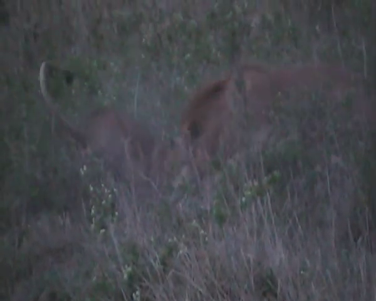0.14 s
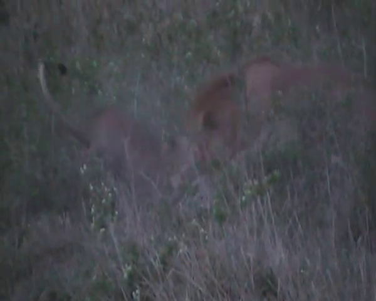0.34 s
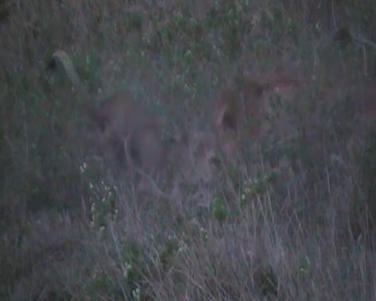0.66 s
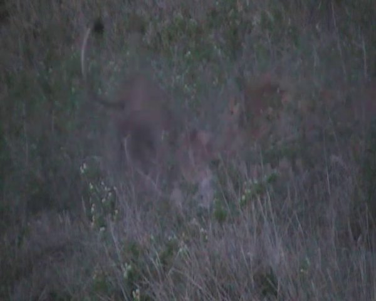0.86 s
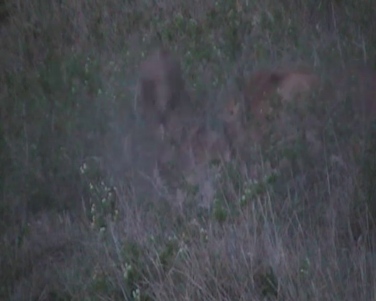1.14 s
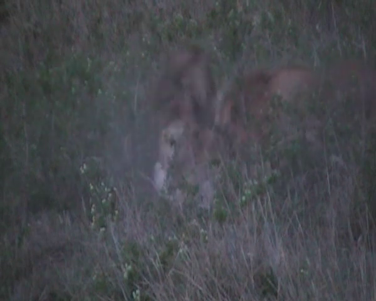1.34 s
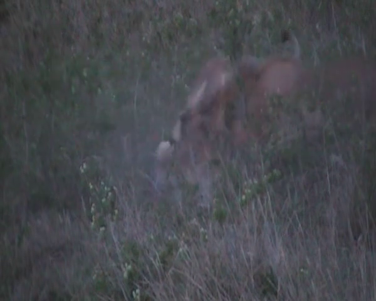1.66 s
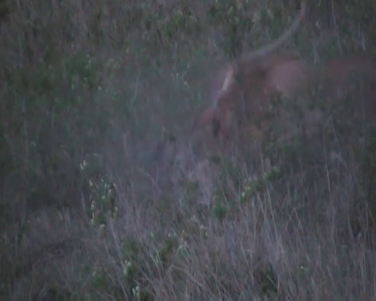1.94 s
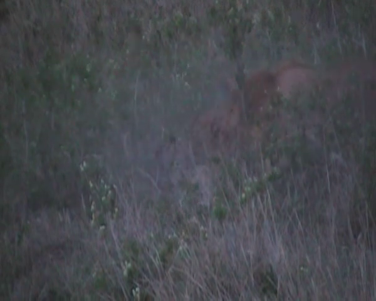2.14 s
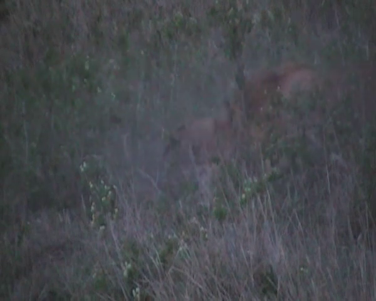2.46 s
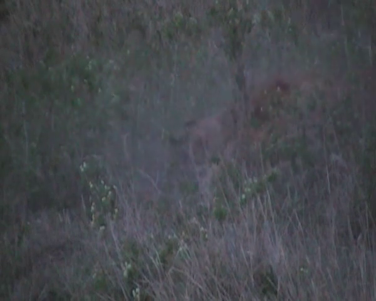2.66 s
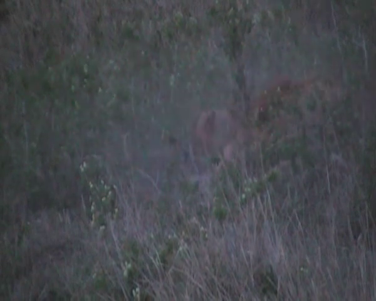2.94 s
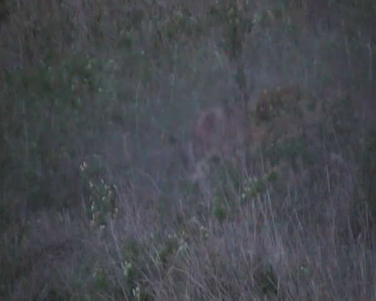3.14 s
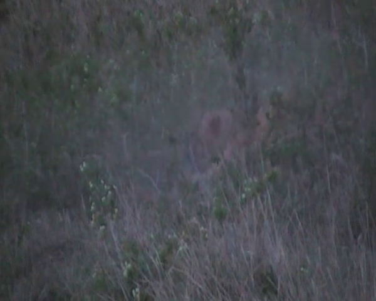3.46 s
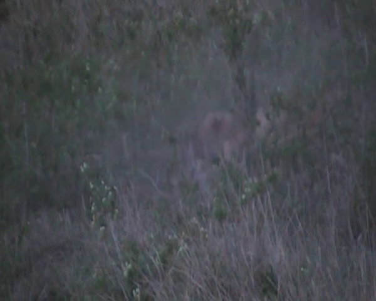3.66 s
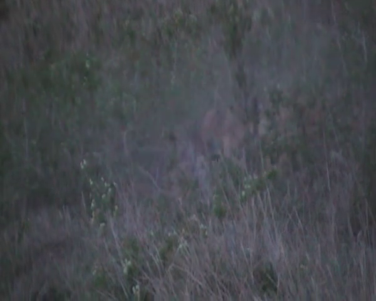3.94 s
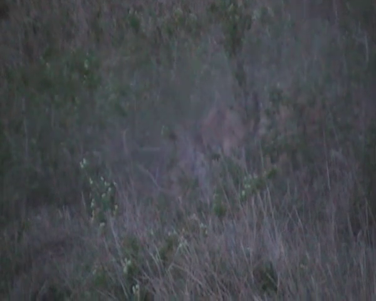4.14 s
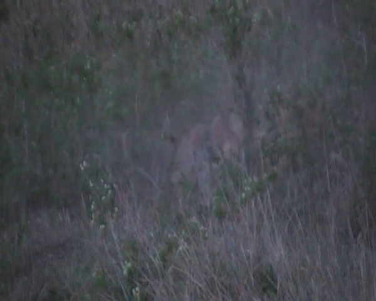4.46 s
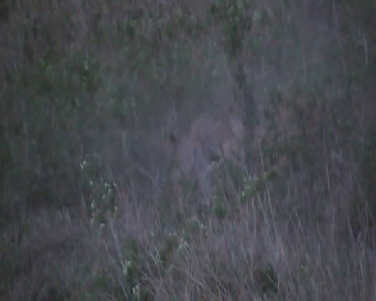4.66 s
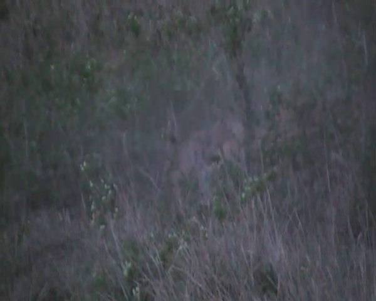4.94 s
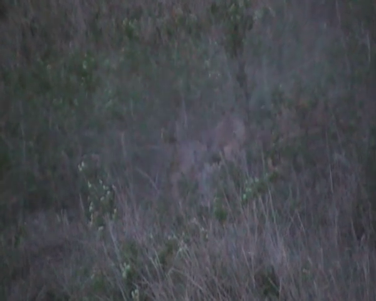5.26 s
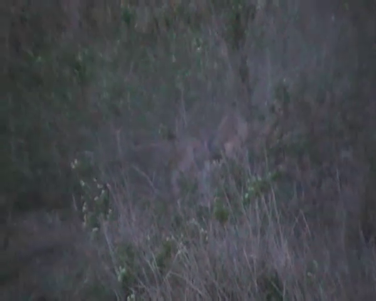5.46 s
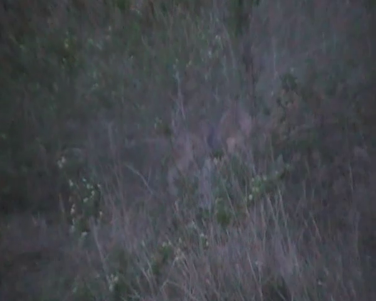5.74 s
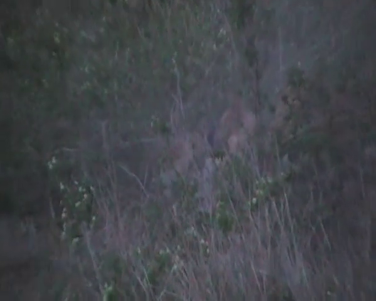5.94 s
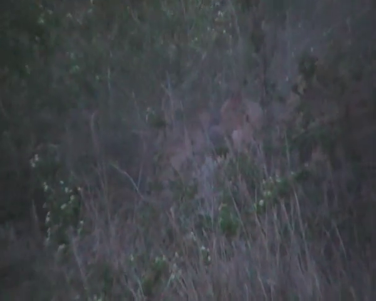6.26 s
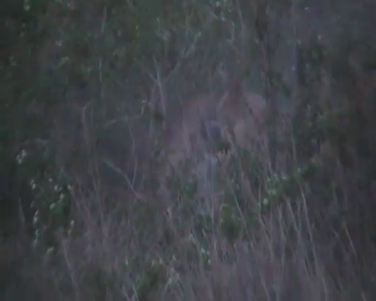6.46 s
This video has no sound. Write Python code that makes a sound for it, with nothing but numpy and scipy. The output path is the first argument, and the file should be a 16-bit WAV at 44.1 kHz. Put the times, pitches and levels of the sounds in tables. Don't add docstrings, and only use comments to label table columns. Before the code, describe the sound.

Dusk in grassy bush, heard through a stereo microphone with slightly dulled top treble. After a silent start, twigs crack and a cricket chirps, then a warthog in distress screams piercingly for over two seconds, rasping and breathy. A gasping pause with thuds follows, then a clearer squeal, broken catches, rapid throat clicks and a loud closing squeal over faint insect hum and low engine throb.

```python
import sys
import numpy as np
from scipy import signal
from scipy.fft import rfft, irfft, next_fast_len
from scipy.io import wavfile
from scipy.ndimage import uniform_filter1d, map_coordinates

SR = 44100
rng = np.random.default_rng(int(sys.argv[2]) if len(sys.argv) > 2 else 0)


def dump(signal):
    limited = np.clip(np.atleast_2d(signal).T, -1, 1)
    pcm = np.round(limited * 32767).astype(np.int16)
    wavfile.write(sys.argv[1], SR, pcm)


def invert_db(x):
    u = np.asarray(x, float) / 20
    return 10 ** u


N = 291045
T = np.arange(N) / SR


def unit(x):
    return x / np.sqrt(np.mean(x ** 2) + 1e-20)


def along(points, hz):
    f, v = np.transpose(points)
    return np.interp(np.log(hz + 1), np.log(f + 1), v)


def curves(rows):
    s, *cols = np.transpose(rows)
    gate = np.clip(np.minimum(T - s[0], s[-1] - T) / 0.0025 + .5, 0, 1)
    return [gate] + [np.interp(T, s, c) for c in cols]


def wobble(rate, size=N):
    return map_coordinates(rng.standard_normal(int(size * rate / SR) + 4), [T[:size] * rate])


def filtered(x, response):
    m = next_fast_len(N + SR // 2)
    return irfft(rfft(x, m) * response(np.fft.rfftfreq(m, 1 / SR)), m)[..., :N]


def coloured(x, spectrum):
    return unit(filtered(x, lambda hz: invert_db(along(spectrum, hz))))


def peak(f, hz, width):
    return 1j * f * width / (hz * hz - f * f + 1j * f * width)


# frequency in Hz, level in dB.
DUSK = [(20, 8), (32, -3), (47, -16), (75, 5), (130, -3.5), (200, -0.5), (300, -2), (700, -5), (1000, -10),
        (2300, -13), (2900, -19), (3800, -16.5), (4700, -18), (10000, -19.5), (12000, -36), (15000, -56)]
# time in seconds, level in dB.
DUSK_LEVEL = [(.69, -63), (.72, -38), (1.1, -41.5), (3.9, -43.5), (6.6, -45)]
# frequency in Hz, correlation from -1 to 1.
ALIKE = [(25, .45), (60, 0.9), (130, 0.22), (290, -0.2), (630, -0.17), (1370, 0.26), (3010, 0.16),
         (6580, 0.72), (14400, 0.76)]


def dusk():
    turn = lambda hz: np.arccos(np.clip(along(ALIKE, hz), -1, 1)) / 2
    noise = rng.standard_normal((2, N)) * invert_db(1.3 * wobble(12.0))
    mid, side = filtered(noise, lambda hz: invert_db(along(DUSK, hz)) * [np.cos(turn(hz)), np.sin(turn(hz))])
    grass = unit(np.array([mid + side, mid - side]))
    chorus = unit(filtered(rng.standard_normal((2, N)), lambda f: peak(f, 4660, 300) ** 2))
    throb = lambda f: peak(f, 75.0, 30.0) ** 2 + 0.46 * peak(f, 99.8, 13.0) ** 2
    idle = unit(filtered(rng.standard_normal(N), throb))
    hiss = grass + invert_db(-5.0 + 4.5 * wobble(50)) * chorus
    return invert_db(curves(DUSK_LEVEL)[1]) * hiss + invert_db([[-52], [-50.5]]) * idle


# first chirp in seconds, end in seconds, gap in ms, peak in dB.
BOUTS = [
    (.7225, 2.7, 92.1, -30),
    (4.692, 5.5, 94.4, -32.5),
    (5.542, 6.33, 92.3, -33.5),
]


def cricket():
    out, t = np.zeros(N + SR), np.arange(SR // 20) / SR
    shape = np.interp(t, [0, .004, .012, .022, .03], [0.058, 0.74, 0.92, 0.85, 0.017])
    pitch_hz = 4830 - 230000 * t ** 2 - 2500 * t
    note = shape * np.sin(2 * np.pi * np.cumsum(pitch_hz) / SR)
    for first, end, gap_ms, db in BOUTS:
        for s in np.arange(first, end, gap_ms / 1000):
            out[round(s * SR):][:len(t)] += invert_db(db + 5.0) * note
    return out[:N]


# time in seconds, level in dB, ring in Hz.
TWIGS = [
    (0.89, -29, 7540),
    (0.94, -24, 7450),
    (0.961, -16, 8900),
    (0.972, -22, 9950),
    (1.0246, -16, 8100),
    (1.061, -28, 9300),
    (5.8585, -20, 8900),
]
# time in seconds, peak in dB.
THUMPS = [
    (0.778, -29),
    (1.119, -23.5),
    (2.041, -24),
    (3.711, -21),
    (4.029, -22.5),
    (4.656, -33),
    (4.953, -26),
]


def scuffle():
    out, t = np.zeros(N + SR), np.arange(SR // 10) / SR
    for s, db, hz in TWIGS:
        snap = rng.standard_normal(len(t)) * .5 + np.sin(2 * np.pi * hz * t)
        decay = invert_db(-60 * t / 0.0016) + 0.26 * invert_db(-60 * t / 0.024)
        out[round(s * SR):][:len(t)] += invert_db(db) * decay * snap
    for s, db in THUMPS:
        swell = invert_db(db - 7.5 - 60 * t / 0.097) * (1 - np.exp(-t / 0.00063))
        out[round(s * SR):][:len(t)] += swell * np.sin(2 * np.pi * 190 * t)
    return out[:N]


# time in seconds, rate in Hz.
FLUTTER = [(1.1, 165), (1.23, 200), (1.39, 221), (1.45, 253), (1.68, 277), (1.76, 206), (2.02, 208),
           (2.2, 231), (2.45, 232), (2.7, 201), (2.89, 184), (3.08, 149), (3.2, 152), (3.42, 180),
           (3.7, 162), (4.24, 157), (4.5, 192), (4.6, 174), (4.79, 152.4), (5.25, 154.3), (6.6, 222)]


def folds():
    rate_hz = curves(FLUTTER)[1] * (1 + .05 * wobble(80) + .03 * wobble(12))
    cycles = np.cumsum(rate_hz) / SR
    strength = invert_db(1.06 * rng.standard_normal(N // 64)[cycles.astype(int)])
    return 2 * np.pi * cycles, strength


# level in dB, fundamental first.
OVERTONES = [0, -1, -12, -18.5, -21.5]


def whistle(rows, hoarse, weak_hoarse, depth, weak_depth, flap, size):
    sweep_hz, sweep_lead_rad, weak_db = 165, .3, 8
    span = slice(round(rows[0][0] * SR) - 200, round(rows[-1][0] * SR) + 200)
    gate, hz, db, step_db = (c[span] for c in curves(rows))
    flap, size, n = flap[span], size[span], len(gate)
    weak = np.clip((db.max() - db) / weak_db, 0, 1)
    hoarse = hoarse + (weak_hoarse - hoarse) * weak
    depth = depth + (weak_depth - depth) * weak
    drag_hz = -sweep_hz * (hoarse + depth) * size * np.sin(flap + sweep_lead_rad)
    drag_hz = drag_hz + hz * .04 * hoarse * wobble(500, n)
    drag = 2 * np.pi * np.cumsum(drag_hz) / SR
    unsteady_hz = hz * (1 + .009 * wobble(26, n) + .035 * hoarse * wobble(130, n))
    phase = 2 * np.pi * np.cumsum(unsteady_hz) / SR
    tone = 0
    for k, overtone_db in enumerate(OVERTONES):
        blur = wobble(750, n) * np.sin((k + .95) * phase) + wobble(750, n) * np.cos((k + .95) * phase)
        partial = np.sin((k + 1) * phase + (1 + .9 * k) * drag) + .38 * hoarse * (1 + k) ** .8 * blur
        tone = tone + invert_db(step_db * k ** 0.087 + overtone_db + (1.1 + k) * wobble(24.89, n)) * partial
    swell = unit((1.08 - np.cos(flap)) ** (1.05 * depth) * size ** depth)
    out = np.zeros(N)
    out[span] = np.sqrt(2) * gate * invert_db(db) * swell * tone
    return out


def patchy(x):
    z = signal.stft(x, nperseg=512)[2]
    field = uniform_filter1d(rng.standard_normal(z.shape), size=5, axis=0)
    field = uniform_filter1d(field, size=20, axis=1)
    patch_db = 3.2 * unit(field)
    return signal.istft(z * invert_db(patch_db), nperseg=512)[1][:N]


# frequency in Hz, level in dB.
RASP = [(140, -25), (200, -26.5), (270, -36), (380, -4), (520, 6), (680, 8), (1000, 13.5), (1600, 14),
        (2250, 11), (2700, -81), (4000, 1.5), (9000, -44)]
# frequency in Hz, level in dB.
BLARE = [(1500, -25), (2600, 3), (3300, 0.5), (4000, -4), (4700, -35), (5600, -1.5), (6200, -24),
         (8000, -24)]
# frequency in Hz, level in dB.
HISS = [(5500, -3.5), (6900, 13.5), (7500, 6), (8100, -0.5), (8800, 8), (9300, 1.5), (9900, 7), (10600, -1),
        (12000, -25), (15000, 3.5)]
# time in seconds, frequency in Hz, swell in dB.
CHEST = [(1.1, 455, 1), (1.42, 492, 1), (1.68, 495, 1), (1.76, 440, 4), (1.85, 485, 2), (2.27, 465, 3.5),
         (2.39, 420, -5), (2.52, 415, -0.5), (2.75, 430, -3.5), (2.89, 485, 1), (3.07, 480, -1.5),
         (3.2, 450, -4), (3.28, 500, 3.5), (3.38, 550, 1.5), (3.5, 500, -7.5), (3.66, 480, 1.5),
         (3.74, 460, -13)]
# time in seconds, effort in dB, mouth opening in dB.
FIRST_BREATH = [(1.1, -57, -8), (1.14, -39, 7), (1.27, -35, 9.5), (1.6, -35.5, 3.5), (1.82, -26, 3.5),
                (2.25, -24, 0), (2.45, -24, 0), (2.7, -22.5, -1.5), (2.95, -18.5, -5.5)]
IN_BREATH = [(3.74, -47, 1.5), (3.834, -34.5, -16.5), (3.95, -50.5, -4.5), (4.08, -68, 13.5),
             (4.19, -62, 6.5)]
ITS_END = [(2.95, -20.5, -8.5), (3.15, -24, -7), (3.33, -23, -6.5), (3.42, -21.5, -1.5), (3.72, -21, -5.5),
           (3.74, -73, -7)]
SECOND_BREATH = [(4.18, -66, -34), (4.21, -22, -20), (4.29, -33.5, -3), (4.4, -32.5, -13), (4.6, -28, -10),
                 (4.76, -28.5, -11.5), (4.95, -28.5, -18), (5.1, -26, -14), (5.25, -29, -17.5)]
STUTTER = [(5.25, -32, -26), (5.32, -40, -26), (5.38, -29, -24), (5.42, -26.5, -21), (5.5, -33, -21),
           (5.58, -36, -21), (5.7, -32, -26), (5.76, -30, -21), (5.8, -39, -18)]
LAST_BREATH = [(5.8, -31, -19), (5.96, -34, -19), (5.98, -35, -26), (6.17, -32, -29), (6.22, -25, -20),
               (6.33, -34, 1), (6.5, -29.5, -14), (6.6, -31, -4)]
# breath table, drone at its start in dB, drone change in dB/s, hiss over blare in dB.
PUFFS = [
    (FIRST_BREATH, -21, -4, 1.5),
    (IN_BREATH, -66, -3, 5),
    (SECOND_BREATH, -58, 14, -1),
    (STUTTER, -65, 3, -3),
    (LAST_BREATH, -63, 3, -7),
    (ITS_END, -29, -4, -1.5),
]


def breath(flap, size):
    hiss_per_mouth_db, drone_rise_s = 1.41, 0.053
    puff = size * (1 - .6 * np.cos(flap))
    air = lambda: invert_db(1.3 * wobble(45)) * rng.standard_normal(N)
    slap = .2 * unit(size * np.exp(-40 * (1 + np.cos(flap))))
    rasp = coloured(patchy(puff * air() + 1.05 * puff ** 2 + slap), RASP)
    blare = coloured(patchy(puff * air() + slap), BLARE)
    hiss = coloured(patchy(puff ** 0.037 * air()), HISS)
    chest_hz, swell_db = curves(CHEST)[1:]
    ring = 2 * np.pi * np.cumsum(chest_hz * (1.01 + .024 * wobble(30))) / SR
    chest = (1.4 + wobble(80)) * np.sin(ring)
    chest = unit(chest + .6 * wobble(80) * np.sin(.84 * ring) + .3 * wobble(60) * np.sin(.76 * ring))
    total = 0
    for rows, chest_db, change_db, hiss_db in PUFFS:
        gate, effort_db, mouth_db = curves(rows)
        since_s = np.clip(T - rows[0][0], 0, rows[-1][0] - rows[0][0])
        rise = np.clip(since_s / drone_rise_s, 0, 1) ** 2
        drone = invert_db(chest_db + change_db * since_s) * rise * invert_db(swell_db) * chest
        hiss_gain = invert_db(hiss_per_mouth_db * mouth_db + hiss_db + 2.15 * wobble(9))
        jet = rasp + invert_db(mouth_db) * blare + hiss_gain * hiss
        total = total + gate * (invert_db(effort_db + 4.0) * jet + drone)
    return total


# time in seconds, pitch in Hz, level in dB, overtone step in dB.
LONG_SCREAM = [(1.115, 2120, -32, -3), (1.15, 2825, -20.5, 1.5), (1.2, 3085, -18.5, 2.5),
               (1.26, 2894, -14.5, 1.5), (1.35, 2858, -17.5, 3.5), (1.46, 2798, -18, 1),
               (1.55, 2820, -20, 1), (1.62, 2940, -25.5, 4), (1.7, 2850, -24.5, 4), (1.76, 2645, -13, -3),
               (1.86, 2825, -25.5, -1)]
SCREAM_SAGS = [(1.86, 2898, -37.5, 11.5), (2.15, 2900, -27.5, 9), (2.3, 2817, -28, -4.5),
               (2.5, 2880, -28, 4), (2.62, 2736, -32.5, -27), (2.72, 2650, -18.5, -18),
               (2.82, 2817, -28, -2), (2.87, 2517, -9, -5), (2.945, 2453, -17.5, -10)]
UNDERTONE = [(1.125, 1960, -33, -13), (1.15, 2443, -19, -2), (1.22, 2500, -20, -8), (1.3, 2404, -25, -10),
             (1.38, 2365, -17.5, -17), (1.44, 2318, -34, -18)]
FIRST_RASP = [(4.205, 3897, -48, -30), (4.23, 4100, -33, -29), (4.3, 4590, -25.5, -29),
              (4.36, 4670, -41, -30)]
ITS_TWIN = [(1.14, 3190, -59, -9), (1.3, 3173, -47, 2), (1.55, 3206, -27.5, 10), (1.72, 3327, -19.5, 6.5),
            (1.88, 3157, -28, 10), (2.0, 3296, -19, 9.5), (2.25, 3086, -26.5, 2.5)]
TWIN_BREAKS = [(2.25, 3050, -27.5, 9.5), (2.4, 3120, -12.5, -4.5), (2.5, 2950, -15.5, -3),
               (2.56, 3000, -13.5, -3.5), (2.62, 3370, -24, 1.5), (2.67, 3300, -15.5, 3),
               (2.7, 3060, -13.5, -5), (2.8, 3020, -14, -5), (2.86, 2900, -17.5, -8)]
DROPPED_SCREAM = [(2.66, 2022, -24, -5), (2.85, 2026, -17.5, -45), (2.95, 2006, -12.5, -29),
                  (3.03, 2200, -15, -23), (3.12, 2198, -10.5, -19), (3.26, 2177, -10.5, -14),
                  (3.4, 2462, -15.5, -7), (3.69, 2239, -6, -22), (3.735, 2123, -12, -9.5)]
OVERBLOWN = [(2.96, 4819, -22.5, -37), (3.1, 4776, -26, -32), (3.36, 5200, -20, -47),
             (3.45, 5476, -21.5, -34), (3.58, 5066, -21.5, -37), (3.68, 4458, -18.5, -26),
             (3.73, 4187, -55, -26)]
THIN_STRAND = [(2.96, 7405, -26, -40), (3.05, 7340, -26.5, -40), (3.25, 7500, -37, -40),
               (3.4, 7630, -27, -42), (3.55, 7500, -27, -38), (3.66, 7450, -37, -44)]
ARCHED_SQUEAL = [(4.195, 950, -58, -9), (4.215, 1059, -29, -7), (4.27, 1316, -13.5, -26),
                 (4.37, 1851, -11.5, -10), (4.45, 1973, -8, -11.5), (4.56, 2072, -8.5, -8.5),
                 (4.66, 1931, -8.5, -16.5), (4.8, 1689, -16.5, -26), (4.95, 1683, -13, -27)]
SQUEAL_TAIL = [(4.95, 1680, -15.5, -23), (5.03, 1759, -11, -26), (5.108, 1855, -11.5, -16.5),
               (5.16, 1597, -14, -29), (5.252, 1340, -27.5, -32), (5.3, 1298, -68, -15)]
MUTTER = [(5.78, 1047, -28, -31), (5.86, 1060, -28.5, -21), (5.92, 1074, -26.5, -25),
          (5.96, 1086, -20.5, -20), (5.975, 1004, -31, -22), (6.19, 1101, -34, -11.5)]
LAST_SQUEAL = [(6.19, 1144, -37, -1), (6.25, 1560, -15, -12), (6.3, 1660, -16.5, -14),
               (6.38, 1798, -11, -21), (6.41, 1871, -8.5, -16.5), (6.5, 2000, -5.5, -17.5),
               (6.555, 2041, -8.5, -16), (6.572, 2194, -8, -19), (6.585, 1948, -2.5, -16),
               (6.6, 1860, -14, -26)]
GROWL = [(1.76, 1003, -27.5, -14), (1.9, 1154, -33.5, -13), (2.12, 1132, -23.5, -0.5),
         (2.3, 939.6, -27, -3), (2.55, 999, -39, 6), (2.7, 1187, -27.5, 9), (2.94, 1004, -44.5, -23)]
GRUNT = [(5.25, 711, -40.5, 2), (5.45, 697.5, -35.5, -8), (5.72, 682, -36.5, -20), (5.85, 711, -31.5, -7),
         (5.96, 695, -32.5, 3), (6.17, 648.4, -31, -7)]
NASAL_ONSET = [(4.21, 1956, -29, -30), (4.225, 2026, -24.5, -29), (4.28, 1930, -23.5, -30),
               (4.34, 1943, -26, -30), (4.37, 2020, -37, -33)]
NASAL_MUTTER = [(5.79, 2022, -47, -30), (5.83, 2000, -45, -30), (5.87, 1976, -41, -30),
                (5.92, 1999, -31, -30), (5.965, 2020, -35, -30)]
LOW_WHINE = [(3.27, 331.3, -48, -37), (3.35, 355.7, -36.5, -40), (3.43, 386.5, -31, -40),
             (3.52, 395, -49, -40)]
SPLIT_STRAND = [(2.22, 2690, -30, -20), (2.29, 2750, -21, -20), (2.36, 2692, -31, -20),
                (2.47, 2700, -25, -20), (2.55, 2695, -21, -23), (2.62, 2680, -40, -20),
                (2.71, 2650, -19.5, -20), (2.78, 2640, -19, -20), (2.83, 2620, -28, -20)]
JETS = [(LONG_SCREAM, .4, .42, .65, .65), (SCREAM_SAGS, .5, .48, .55, .5), (UNDERTONE, .45, .45, .6, .6),
        (FIRST_RASP, .9, .9, .6, .6), (ITS_TWIN, .42, .5, .35, .5), (TWIN_BREAKS, .48, .5, .45, .5),
        (DROPPED_SCREAM, .45, .65, .5, .5), (OVERBLOWN, .9, .9, .5, .5), (THIN_STRAND, .35, .35, .3, .3),
        (ARCHED_SQUEAL, .3, .5, .22, .72), (SQUEAL_TAIL, .36, .5, .5, .7), (MUTTER, .6, .62, .6, .62),
        (LAST_SQUEAL, .28, .65, .15, .75), (GROWL, .7, .7, .45, .45), (GRUNT, .9, .9, .35, .35),
        (NASAL_ONSET, .4, .4, .5, .5), (NASAL_MUTTER, .4, .4, .5, .5), (LOW_WHINE, .03, .03, .03, .03),
        (SPLIT_STRAND, .4, .5, .4, .5)]
# frequency in Hz, level in dB.
MOUTH = [(3000, 0), (4400, -1), (5050, -3), (5700, 2), (6150, -2), (6550, 2), (7100, -4), (7700, 2),
         (8400, -4), (9500, 0), (11000, -3), (13000, -12)]
# time in seconds, length in ms, depth in dB.
CATCHES = [(1.18, 18, 3.5), (1.24, 2.7, 10), (2.945, 16, 4), (4.891, 28, 4), (4.948, 13.7, 23),
           (5.013, 2.2, 8), (5.159, 20, 8.5), (5.217, 20, 25), (5.355, 5.5, 15), (5.388, 15.3, 18),
           (5.435, 13, 21), (5.472, 12.8, 4), (5.485, 11.4, 6), (5.531, 7.4, 16), (5.599, 17.6, 20),
           (5.634, 18, 23), (5.67, 22, 17), (5.738, 13, 16), (5.776, 12.06, 30), (5.869, 15, 14),
           (5.893, 16, 11), (6.234, 6.6, 25), (6.265, 15.5, 32), (6.387, 15, 13), (6.566, 5.1, 7.5)]
# time in seconds, length in seconds, start in Hz, end in Hz, level in dB.
GASPS = [
    (3.753, 0.0689, 249.5, 335, -39.5),
    (4.027, 0.11, 355, 358, -48.5),
]
# frequency in Hz, width in Hz, depth 0-1.
HOLLOWS = [(587.5, 157, 1), (6224, 450, 1), (3650, 140, 0.31), (6970, 420, 1)]


def warthog():
    slap_shut_ms, slap_shut_db, overshoot, lowest_hz = 11.2, 15.5, .03, 110
    flap, size = folds()
    size = uniform_filter1d(size, size=60)
    jets = sum(whistle(*cry, flap, size) for cry in JETS)
    voice = filtered(jets, lambda hz: invert_db(along(MOUTH, hz))) + breath(flap, size)
    shut = CATCHES + [(s - slap_shut_ms / 1000, slap_shut_ms, slap_shut_db) for s, *rest in CREAKS]
    shut_db = 0
    for s, ms, db in shut:
        end = s + ms / 1000
        times = [s - .008, s + 0.0073, end - .003, end + 0.00085, end + 0.013]
        shut_db = shut_db + np.interp(T, times, [0, -1.1 * db, -1.1 * db, overshoot * db, 0])
    voice = voice * invert_db(shut_db)
    for s, length_s, start_hz, end_hz, db in GASPS:
        u = np.clip((T - s) / length_s, 0, 1)
        phase = 2 * np.pi * np.cumsum(start_hz + (end_hz - start_hz) * u) / SR
        whine = np.sin(phase) + 0.67 * np.sin(2 * phase) + .5 * np.sin(3 * phase)
        voice = voice + invert_db(db) * np.sin(np.pi * u) ** .5 * whine

    def notched(f):
        notches = np.prod([1 - min(depth, 1) * peak(f, hz, w) for hz, w, depth in HOLLOWS], axis=0)
        return (1j * f / (lowest_hz + 1j * f)) ** 2 * notches

    return filtered(voice, notched)


# time in seconds, peak in dB, throat ring in Hz.
CREAKS = [(5.98, -15.5, 873), (6.001, -13, 1030), (6.018, -16, 975), (6.036, -13.5, 1075),
          (6.053, -18, 975), (6.068, -26, 1000), (6.09, -11, 1030), (6.112, -13, 1038), (6.134, -18, 963),
          (6.156, -11, 1134), (6.18, -9, 1140), (6.184, -15, 1240), (6.198, -17, 1100), (6.204, -11, 1150),
          (6.222, -10, 1440)]


def creaks():
    out, t = np.zeros(N + SR), np.arange(SR // 20) / SR
    for s, db, hz in CREAKS:
        puff = 1.16 * uniform_filter1d(uniform_filter1d(rng.standard_normal(len(t)), size=5), size=4)
        upper = 0.5 * np.sin(2 * np.pi * 2000 * t) + .2 * np.sin(2 * np.pi * 3700 * t)
        ring = np.sin(2 * np.pi * hz * t) + (upper + 0.7 * puff) * invert_db(-60 * t / 0.015)
        swell = invert_db(db + 8.0 - 60 * t / 0.022) * (1 - np.exp(-t / 0.0027))
        out[round((s - .001) * SR):][:len(t)] += swell * ring
    return out[:N]


# frequency in Hz, time to fall 60 dB in seconds.
BUSH = [(300, 0.17), (2500, 0.21), (10000, 0.049)]


def bush(x):
    hz, t, z = signal.stft(rng.standard_normal((2, SR // 3)), SR, nperseg=256)
    colour_db = along([(300, 6.9), (2500, 3.1), (9000, 12.0)], hz)
    decay_db = -60 * t / along(BUSH, hz)[:, None]
    tail = signal.istft(z * invert_db(colour_db[:, None] + decay_db), SR, nperseg=256)[1]
    late = np.pad(x, (200, 0))[None]
    return signal.fftconvolve(late, tail / np.linalg.norm(tail[0]), axes=1)[:, :N]


# frequency in Hz, left over right in dB.
LEAN = [(200, -1.7), (700, -1.7), (2300, 0), (4300, -1), (8000, .7)]
# time in seconds, left over right in dB.
TURNING = [(1.15, 0), (1.53, 0.5), (2.61, 0), (3.64, 0.5), (3.74, 0), (3.77, 0), (3.81, -0.5), (4.14, 1),
           (4.17, -0.5), (6.6, 0)]


def scene():
    near = warthog() + creaks() + scuffle()
    chirp = cricket()
    placed = filtered(near, lambda hz: invert_db(along(LEAN, hz) / 2 * [[1], [-1]]))
    placed = placed * invert_db(curves(TURNING)[1] / 2 * [[1], [-1]])
    drift_db = np.interp(T, [1.0, 5.0], [2.2, -.4])
    scattered = invert_db(-13.0) * bush(near + 2.0 * chirp)
    return placed + scattered + chirp * invert_db([drift_db, -drift_db]) + dusk()


def roll_off(x):
    return signal.sosfilt(signal.butter(12, 15400, fs=SR, output="sos"), x)


# frequency in Hz, level in dB.
MIC = [(30, -10.5), (60, -1.5), (10300, -3), (11500, -3.5), (13500, -8.5), (14600, -43), (16000, -35)]


def record(dry):
    start_s, fade_s = .692, 0.0077
    x = filtered(dry, lambda hz: invert_db(along(MIC, hz)))
    x = x * np.clip((T - start_s) / fade_s, 0, 1)
    x = x / (1 + np.abs(x) ** 12) ** (1 / 12)
    return roll_off(x)


dry = scene()
out = record(dry)
dump(out)
```